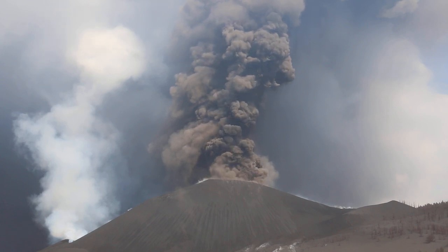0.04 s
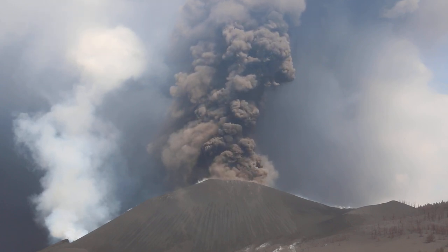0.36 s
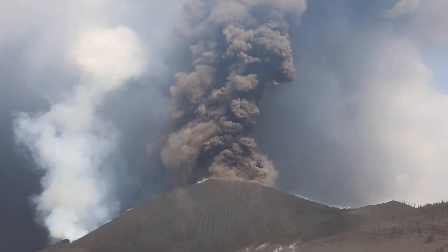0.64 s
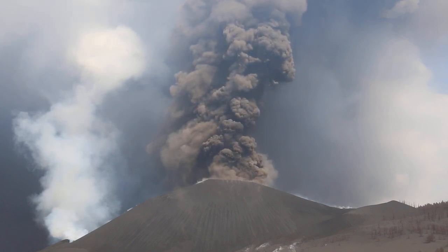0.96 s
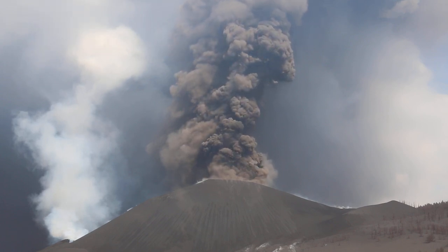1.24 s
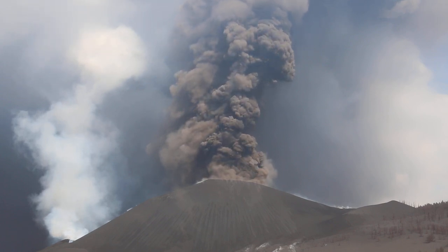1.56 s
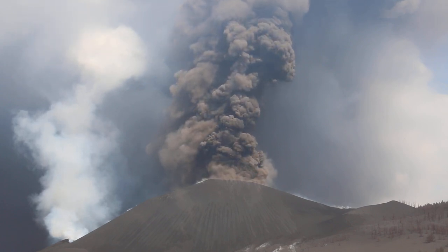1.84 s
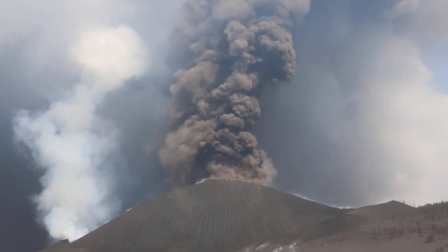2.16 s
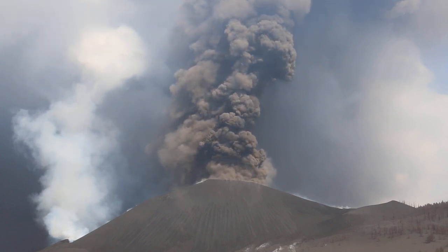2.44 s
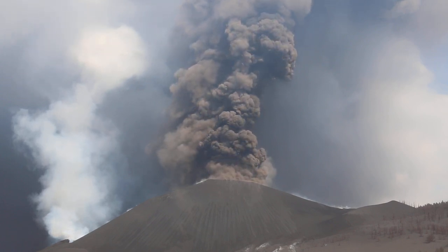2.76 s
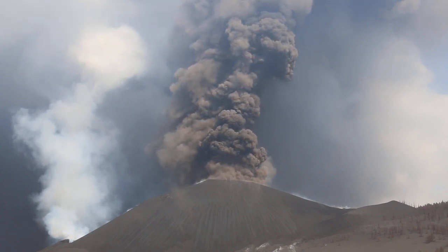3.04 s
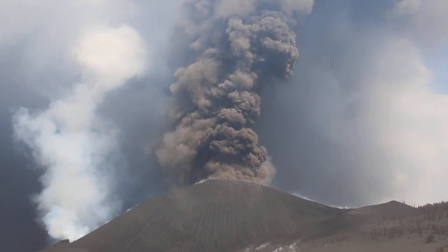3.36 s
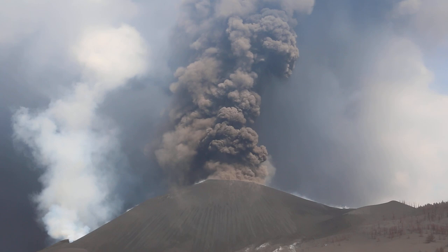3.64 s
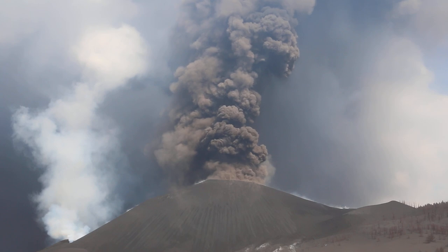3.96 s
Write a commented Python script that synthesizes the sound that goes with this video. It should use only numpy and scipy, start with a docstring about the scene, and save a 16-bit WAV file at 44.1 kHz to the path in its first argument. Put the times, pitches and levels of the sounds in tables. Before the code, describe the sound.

Distant volcano rumbling with short thumps, as wind gusts buffet the microphone.

```python
"""Distant volcano in gusty wind

An eruption heard from far away across open land: the ash jet roars dully, and bursts in the vent
arrive as short thumps. Close up, gusts buffet the two microphone ports, mostly the right one.
A low drone, like a far engine, slowly grows and sinks in pitch over faint hiss."""
import sys
import numpy as np
from scipy import signal
from scipy.fft import rfft, irfft
from scipy.io import wavfile
from scipy.ndimage import uniform_filter1d

SR = 44100
rng = np.random.default_rng(int(sys.argv[2]) if len(sys.argv) > 2 else 0)


def to_wav(s):
    """Save 16-bit WAV."""
    ch = np.atleast_2d(s).T  # columns
    pcm = np.round(np.clip(ch, -1, 1) * 32767)  # PCM
    wavfile.write(sys.argv[1], SR, pcm.astype(np.int16))


N = 176400


def undb(db):
    """Decibels to gain."""
    return 10 ** (np.asarray(db) / 20)


def unit(x):
    """Scale to rms 1."""
    return x / np.sqrt(np.mean(x ** 2))


def colour(x, points):
    """Filter by (Hz, dB) points joined on a log-frequency axis."""
    hz, db = np.array(points).T
    bin_hz = np.maximum(np.arange(N // 2 + 1) * SR / N, 1)
    gain = undb(np.interp(np.log(bin_hz), np.log(hz), db))
    return irfft(rfft(x) * gain, N)


def noise(points, channels=1):
    """Unrelated coloured noises of rms 1."""
    return unit(colour(rng.standard_normal((channels, N)), points))


def walk(rate_hz):
    """A random drift of rms 1: levels held for 1 / rate_hz seconds and smoothed twice."""
    hold = int(SR / rate_hz)
    steps = np.repeat(rng.standard_normal(N // hold + 1), hold)
    return unit(uniform_filter1d(uniform_filter1d(steps, hold), hold)[:N])


def hiss():
    """A faint, steady hiss behind everything, different in each channel."""
    # Each row: frequency in Hz, relative level in dB.
    spectrum = [(100, 7.5), (400, 4.5), (1000, 5.5), (1300, 4), (2500, 0.5), (4000, -0.5), (8000, -3.5),
                (12000, -7), (15500, -10.5)]
    return undb(-58) * noise(spectrum, channels=2)


def drone(t):
    """A far, almost pure low tone that wavers on its way through the air."""
    # Each row: time in seconds, pitch in Hz, level in dB.
    course = [(0, 130.6, -39), (.5, 129.6, -45.5), (1, 128.8, -46.5), (1.5, 128.7, -46.5),
              (1.75, 127.2, -42), (2.1, 127.9, -39.5), (2.4, 127.7, -38), (2.7, 127.2, -38.5),
              (3, 126.6, -35.5), (3.3, 127.6, -39), (3.6, 127.8, -37), (4, 126.4, -36)]
    at, hz, db = np.array(course).T
    phase = 2 * np.pi * np.cumsum(np.interp(t, at, hz)) / SR
    waver_db = 1.17 * walk(rate_hz=12)
    return unit(np.sin(phase)) * undb(np.interp(t, at, db) + waver_db)


def wind(t):
    """At the microphone, eddies push and pull on one port at a time; turbulence swells round them."""
    # Each row: centre time in seconds, level in dB, pitch in Hz, port (0 left, 1 right).
    buffets = [(.240, -23, 182, 0), (.257, -18.5, 107, 1), (.281, -27, 104, 1), (.300, -14.5, 130, 1),
               (0.339, -14, 140, 1), (0.361, -14.5, 140, 1), (0.404, -13, 112, 1), (.416, -21, 160, 1),
               (.437, -20.5, 89, 1), (0.463, -15.5, 142, 1), (.499, -19, 149, 1), (0.602, -25.5, 79, 0),
               (0.714, -17.5, 179.2, 1), (0.75, -23, 148, 1), (0.776, -18.5, 144, 1), (.787, -26, 170, 0),
               (.819, -23.5, 175, 0), (0.848, -25.5, 163, 0), (.868, -17, 114, 1), (0.916, -13.5, 166, 1),
               (1.257, -16.5, 175, 1), (1.272, -24, 150, 0), (1.282, -23, 164, 1), (1.302, -15, 126, 1),
               (1.316, -12, 160, 1), (1.477, -28.5, 112, 1), (1.533, -16.5, 102, 1), (1.537, -25, 160, 0),
               (1.572, -25.5, 120, 0), (1.604, -18, 125, 1), (1.743, -30, 105, 1), (2.789, -29, 91, 1),
               (2.828, -20, 99, 0), (2.846, -25, 95, 0), (2.868, -20.5, 96, 1), (3.406, -25.5, 120, 1),
               (3.435, -24, 115, 1), (3.560, -17, 113, 1)]
    # The light wind that never quite rests. Each row: time in seconds, level in dB.
    breeze_levels = [(0, -48.5), (.6, -42.5), (1.6, -41.5), (2.0, -48.5), (2.6, -55.5), (3.0, -50),
                     (3.5, -48), (3.75, -50), (4, -51.5)]
    # Turbulence at the ports. Each row: frequency in Hz, relative level in dB.
    spectrum = [(15, 1), (25, -27), (42, -0.5), (70, -2.5), (115, -1), (170, -9.5), (250, -12.5),
                (350, -27.5), (600, -40.5), (2000, -68)]
    half_length_cycles, steepness = 0.53, 0.35  # steepness hastens the flip from push to pull
    gust_spread_s, gust_db = 0.034, -7
    eddies, gust_power = np.zeros((2, N)), np.zeros((2, N))
    for at, db, hz, port in buffets:
        cycles = (t - at) * hz
        phase = 2 * np.pi * cycles
        swell = np.exp(-.5 * (cycles / half_length_cycles) ** 2)
        eddies[port] += undb(db) * swell * np.sin(phase + steepness * swell * np.sin(phase))
        spread = np.exp(-np.abs(t - at) / gust_spread_s) / (2 * hz * gust_spread_s)
        gust_power[port] += undb(db + gust_db) ** 2 * spread
    breeze = undb(np.interp(t, *np.array(breeze_levels).T))
    return eddies + np.sqrt(gust_power + breeze ** 2) * noise(spectrum, channels=2)


def ash_jet(t):
    """The far jet's dull roar: gently swelling turbulence with small shocks scattered through it."""
    # Roar and shocks alike. Each row: frequency in Hz, relative level in dB.
    spectrum = [(15, -17), (25, -7), (40, -5), (75, 0), (120, -1.5), (180, 0), (250, -5), (350, -11.5),
                (500, -12), (700, -15), (900, -14.5), (1010, -12.5), (1150, -25.5), (1450, -21),
                (1700, -29), (2000, -28), (2800, -40), (6000, -63)]
    # The jet's slow rise and fall. Each row: time in seconds, gain in dB.
    trend = [(0, -0.5), (1, 0.1), (1.7, -0.05), (2.5, -1), (4, -1)]
    roar_db, swell_db = -44, 0.26
    shocks_per_s, crackle_db, scatter_db = 60, -54.5, 4
    roar = noise(spectrum)[0] * undb(roar_db + swell_db * walk(rate_hz=9.1))
    shocks = (rng.random(N) < shocks_per_s / SR) * undb(scatter_db * rng.standard_normal(N))
    crackle = undb(crackle_db) * unit(colour(shocks, spectrum))
    return (roar + crackle) * undb(np.interp(t, *np.array(trend).T))


def vent_bursts(t):
    """Each burst lands as a thump: one pressure spike, rounded by distance, with a short noisy tail."""
    # Each row: time in seconds, spike peak in dB, width before filtering in ms, tail gain in dB.
    bursts = [(.930, -25, 0.82, -38), (.979, -26, 2.3, -47), (1.103, -19.5, 1.8, -45),
              (1.2, -26.5, 4.1, -54), (1.4554, -25.5, 0.31, -43.5), (1.648, -29, 1.9, -60),
              (1.686, -20.5, 0.78, -40), (1.733, -33, 1, -44), (1.932, -24, 2.3, -52),
              (2.046, -33.5, .35, -49), (2.2425, -26.5, 1.6, -53), (2.495, -26, 1.1, -41.5),
              (2.5512, -22, 2.25, -47), (3.13, -29, 2, -52), (3.4036, -22.5, 1.13, -37),
              (3.4836, -24.5, 3.5, -57), (3.6285, -28.5, 0.98, -52)]
    # The spike as it reaches the microphone. Each row: frequency in Hz, relative level in dB.
    spike_spectrum = [(30, -25), (70, -9), (140, -1.5), (250, 4), (500, -1), (1000, 7.5), (1200, -6),
                      (2000, -1), (3000, -20), (8000, -45)]
    # The crackling tail. Each row: frequency in Hz, relative level in dB.
    tail_spectrum = [(100, -24), (300, -19.5), (500, 5), (1020, 10.5), (1250, -8.5), (2000, -14.5),
                     (3200, -29), (8000, -50)]
    tail_rise_s, tail_decay_s = 0.0017, 0.008
    spikes, tail_envelope = np.zeros(N), np.zeros(N)
    for at, db, width_ms, tail_db in bursts:
        half_width_s = width_ms / 2000
        pulse = np.exp(-np.log(2) * ((t - at) / half_width_s) ** 2)
        spike = colour(pulse, spike_spectrum)
        spikes -= undb(db) * spike / spike.max()
        age = np.maximum(t - at, 0)
        tail_envelope += undb(tail_db) * (1 - np.exp(-age / tail_rise_s)) * np.exp(-age / tail_decay_s)
    return spikes + tail_envelope * noise(tail_spectrum)[0]


def scene():
    """Far sounds reach both ports alike; wind and hiss differ left and right."""
    t = np.arange(N) / SR
    far_sounds = ash_jet(t) + vent_bursts(t) + drone(t)
    return far_sounds + wind(t) + hiss()


def record(dry):
    """The recorder cuts the top treble steeply."""
    top_hz = 15700
    return signal.sosfilt(signal.ellip(10, .1, 80, top_hz, fs=SR, output="sos"), dry)


dry = scene()
out = record(dry)
to_wav(out)
```